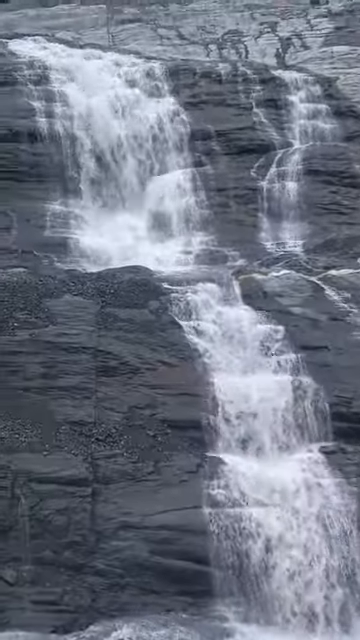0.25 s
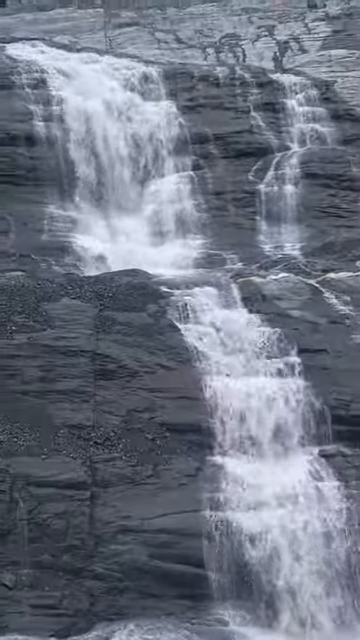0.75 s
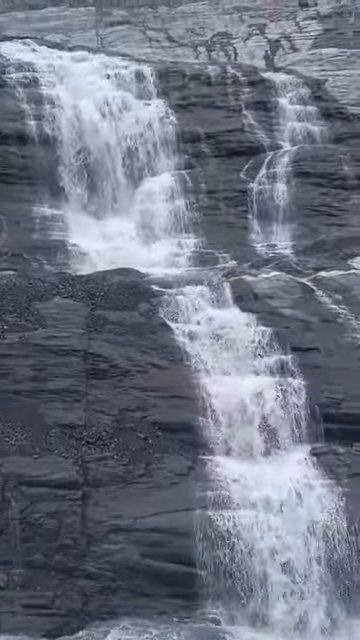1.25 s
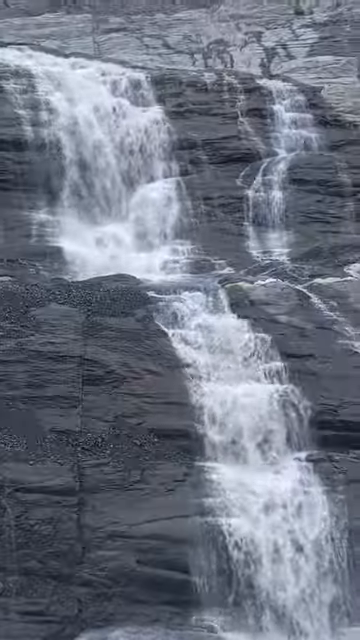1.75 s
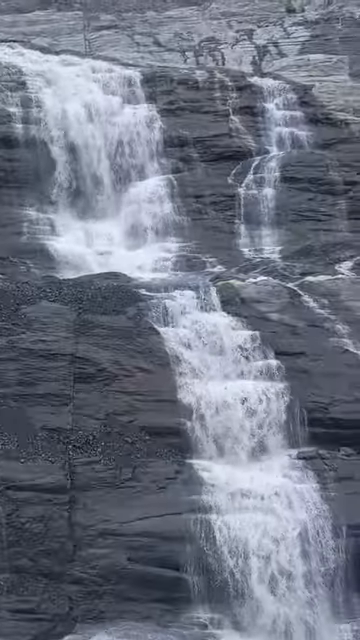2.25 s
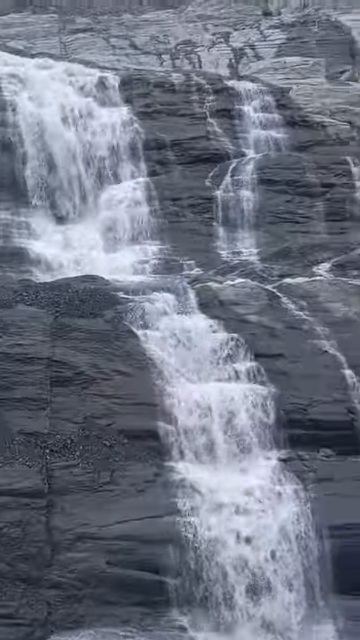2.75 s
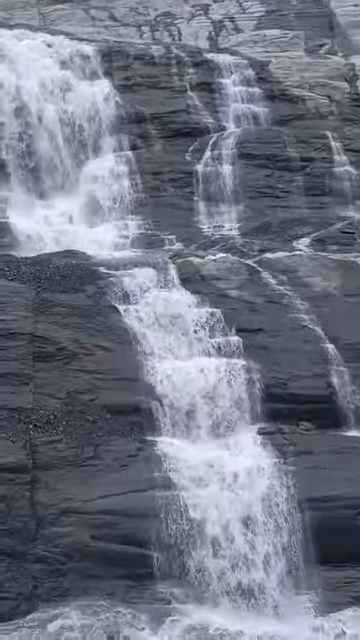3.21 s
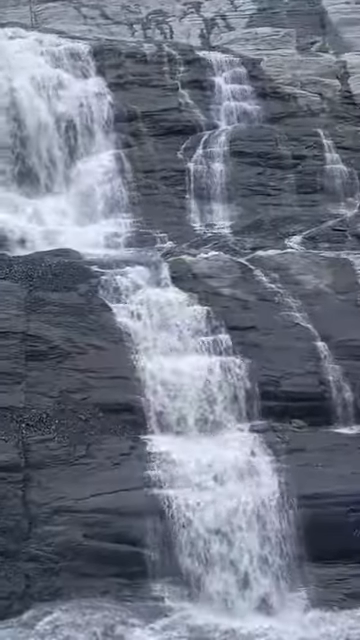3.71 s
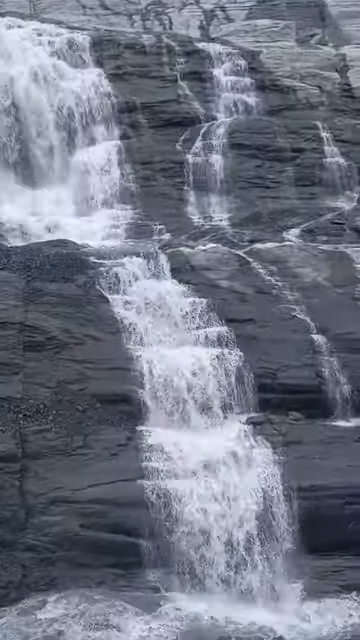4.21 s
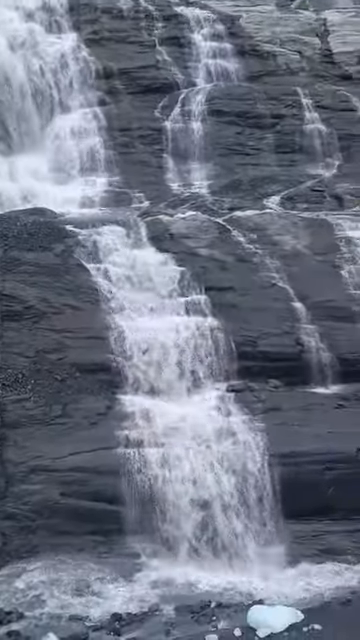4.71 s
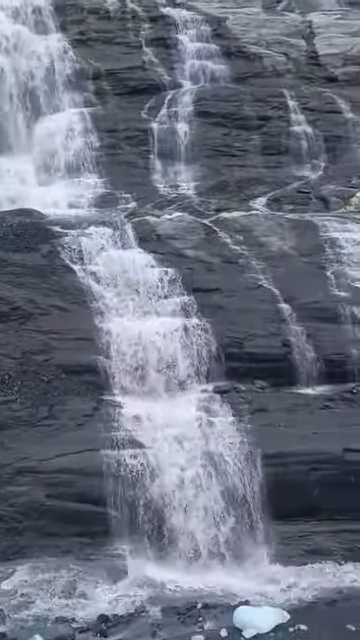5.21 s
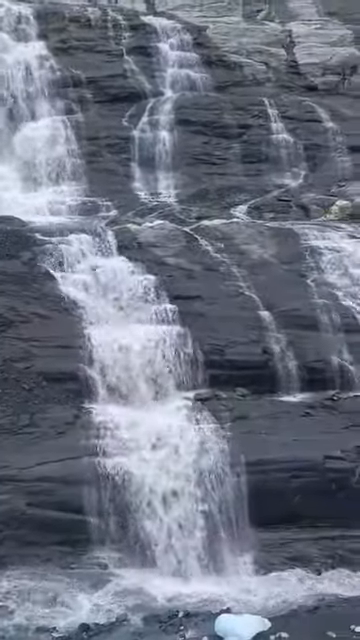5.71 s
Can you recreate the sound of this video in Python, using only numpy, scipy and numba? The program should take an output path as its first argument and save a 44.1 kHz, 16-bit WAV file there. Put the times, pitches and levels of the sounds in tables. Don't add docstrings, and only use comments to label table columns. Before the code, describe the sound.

Rushing waterfall hiss dips and recovers as wind buffets a hand-held phone, with a brief low gulp of water past the middle.

```python
import sys
import numpy as np
from scipy import signal
from scipy.fft import rfft, irfft
from scipy.io import wavfile
from scipy.ndimage import uniform_filter1d
from numba import njit

SR = 44100
rng = np.random.default_rng(int(sys.argv[2]) if len(sys.argv) > 2 else 0)


def ratio(d):
    e = np.asarray(d, float) / 20
    return 10 ** e


def wav_out(sig):
    wavfile.write(sys.argv[1], SR, np.round(np.clip(np.atleast_2d(sig).T, -1, 1) * 32767).astype(np.int16))


N = 262836
TIME, HZ = np.arange(N) / SR, np.arange(N // 2 + 1) * SR / N + 1e-3
OPEN_DB = -24
HOLLOW_HZ = 1330


def curve(table):
    return np.interp(TIME, *np.transpose(table))


def colour(table):
    hz, db = np.transpose(table)
    return ratio(np.interp(np.log(HZ), np.log(hz), db, left=-120, right=-120))


def unit(x):
    return x / np.sqrt(np.mean(x ** 2))


def slew(x, seconds):
    return uniform_filter1d(x, max(int(seconds * SR), 1))


def walk(rate):
    hold = int(SR / rate)
    steps = np.repeat(rng.standard_normal(N // hold + 1), hold)
    return unit(uniform_filter1d(uniform_filter1d(steps, hold), hold)[:N])


def bells(events):
    return sum(db * np.exp(-((TIME - s) / half) ** 2) for s, db, half in events)


def bands(spectrum, lo_hz, per_octave, count):
    place = np.clip(per_octave * np.log2(HZ / lo_hz), 0, count - 1)
    for k in range(count):
        share = np.clip(1 - abs(place - k), 0, 1)
        yield lo_hz * 2 ** (k / per_octave), irfft(spectrum * share, N)


def mottle(x, depth_db, size, cell, cap=np.inf):
    cells = signal.stft(x, nperseg=size)[2]
    blots = rng.standard_normal(cells.shape[1:])
    blots = uniform_filter1d(blots, cell[0], axis=0)
    blots = unit(uniform_filter1d(blots, cell[1], axis=1))
    return signal.istft(cells * ratio(depth_db * np.minimum(blots, cap)), nperseg=size)[1][:, :N]


def ports(source):
    # (frequency [Hz], share [0-1])
    likeness = [(60, .1), (250, 0.4), (700, 0.64), (1300, 0.2), (1900, 0.56), (2800, 0), (5000, 0.22),
                (9000, 0.08), (13000, 0)]
    # (frequency [Hz], phase [radians])
    lead = [(0, 0), (1300, -.3), (1800, .35), (2400, -.55), (3500, -3), (6000, -3.3), (7300, -6.3),
            (15500, -6.3)]
    hz, share = np.transpose(likeness)
    share = np.clip(np.interp(np.log(HZ), np.log(hz), share), 0, 1)
    turn = np.exp(.5j * np.interp(HZ, *np.transpose(lead)))
    common, left, right = (rfft(source()) for _ in range(3))
    together = np.sqrt(share) * common * np.array([turn, 1 / turn])
    return together + np.sqrt(1 - share) * np.array([left, right])


def guard():
    # (time [s], level [dB])
    slow_grip = [(0.0, -24.5), (0.3, -24), (0.7, -24), (1.2, -24.5), (1.55, -25), (1.9, -27), (2.0, -34),
                 (2.5, -33.43), (2.85, -29.5), (2.95, -29), (3.5, -27), (3.75, -25), (4.3, -23.5),
                 (5.0, -24.5), (5.96, -23.5)]
    # (middle [s], depth [dB], half length [s])
    ducks = [(0.401, 3.5, 0.077), (0.527, 7.7, 0.026), (0.605, 8.1, 0.07), (0.797, 6, 0.062),
             (1.011, 5.5, 0.0094), (1.084, 6.1, 0.033), (1.624, 4.5, 0.015), (1.747, 6, 0.044),
             (1.844, 7, 0.022), (1.928, 8.5, 0.02), (2.257, 5, 0.02), (2.412, 8.5, 0.023),
             (2.472, 4, 0.032), (2.566, 5, 0.028), (2.69, 4.5, 0.015), (2.813, 7.5, 0.088),
             (3.066, 2.5, 0.073), (3.223, 4.5, 0.037), (3.387, 6.5, 0.017), (3.511, 6.5, 0.021),
             (3.581, 2, 0.046), (4.003, 4, 0.039), (4.123, 7.5, 0.045), (4.258, 2, 0.044),
             (4.448, 4, 0.046), (4.723, 6.5, 0.024), (4.84, 5.5, 0.02), (4.998, 5, 0.011),
             (5.129, 4.5, 0.0071), (5.916, 6, 0.039)]
    return curve(slow_grip) - bells(ducks)


def mute():
    # (start [s], length [s], depth [dB])
    muted = [(0, 0.1, 8), (0.52, 0.34, 22), (1.034, 0.1, 22), (1.5, 0.14, 6), (1.637, 0.14, 27),
             (1.777, 0.19, 11), (1.95, 1.68, 27.5), (3.69, .12, 14), (4.014, 0.15, 8), (4.725, 0.27, 3),
             (5.46, 0.078, 10), (5.914, .06, 15)]
    spells = sum(db * ((TIME >= s) & (TIME < s + length)) for s, length, db in muted)
    return 1 + slew(1. * spells, .04)


def tint(taken_db):
    # (time [s], turn [0-1])
    swing_away = [
        (0, 0.2),
        (1.4, 0),
        (3.3, 0),
        (3.8, 0.12),
        (4.7, 0.7),
        (5.0, 1),
        (5.7, 1.05),
        (5.96, 0.4),
    ]
    turned = curve(swing_away)
    grip_db = slew(taken_db - taken_db.mean(), 0.27)
    hollow_db = 3 - 10 * turned
    low_db = -0.42 * 0 + 0.42 - 1.5 * turned + 0.34 * grip_db
    lean_db = -2.15 + 0.3 * turned - 0.19 * grip_db
    return hollow_db, low_db, lean_db


@njit
def bubbles(start, hz, size, cycles, glide, length):
    out = np.zeros(length)
    for k in range(len(start)):
        step = 2 * np.pi * hz[k] / SR
        n, phase = int(cycles * SR / hz[k]), 0.
        for i in range(min(3 * n, length - start[k])):
            phase += step * (1 + glide * i / n)
            out[start[k] + i] += size[k] * np.exp(-2. * i / n) * np.sin(phase)
    return out


def churn(count=14000, mean_hz=1617, spread=0.3, size_db=4.0, cap_db=9, cycles=8.6, glide=0.081):
    chance = rng.random((count, 3)).T
    start = (chance[0] * N).astype(np.int64)
    hz = mean_hz * np.exp(spread * 2 * (2 * chance[1] - 1))
    size = ratio(np.minimum(-size_db * np.log(chance[2]), cap_db))
    return unit(bubbles(start, hz, size, cycles, glide, N))


def roar(bubble_db=-7, notch_hz=1793, notch_width_hz=31, notch_depth=0.66, trim_hz=264):
    # (frequency [Hz], level [dB per Hz])
    roar_colour = [(190, -18), (330, -11.5), (458, -11.5), (573, -6.5), (764, -6.5), (1100, -4.5),
                   (1680, 0.5), (1820, 1.5), (1990, -0.5), (2990, -6), (4930, -6), (6410, -3.5), (6840, -9),
                   (7600, -39), (9880, -67), (16700, -120)]
    shape = colour(roar_colour)
    hiss = ports(lambda: rng.standard_normal(N)) * shape
    pops = ports(churn) * np.clip(shape * ratio(0.5), 0, 1)
    both = hiss / np.std(irfft(hiss, N)) + ratio(bubble_db) * pops
    middle = irfft(both * (1 - notch_depth / (1 + ((HZ - notch_hz) / notch_width_hz) ** 2)) * 0
                   + both * (HZ > 2600) * (HZ < 6600), N)
    notch = 1 - notch_depth / (1 + ((HZ - notch_hz) / notch_width_hz) ** 2)
    both = both * notch / np.std(middle.mean(axis=0))
    return both / np.sqrt(1 + (trim_hz / HZ) ** 16)


def flicker(spectrum, hiss_db, surge_db, clump_db=0.07, patch_db=0.48, guard_share=0.29):
    # (middle [s], rise of the churn [dB], half length [s])
    sheets = [(.25, 1, 0.17), (.86, 2, .05), (1.1, 1, 0.025), (1.24, 2.5, 0.028), (2.3, 0.5, .08),
              (2.73, 1.5, 0.021), (3.2, 0.5, .08), (3.87, 1.5, 0.052), (4.6, 0.7, 0.12), (4.75, -1, 0.025),
              (5.4, 1.7, 0.095), (5.55, 2.5, .03), (5.85, 0.5, .07)]
    churn_db = 0.23 * (OPEN_DB - hiss_db) + bells(sheets) + .45 * walk(22)
    churn_db = churn_db - churn_db.mean()
    hollow_db, low_db, lean_db = tint(OPEN_DB - hiss_db)
    low_db = low_db + guard_share * mute() * np.array([[-.75], [.25]])
    out = 0
    for hz, sound in bands(spectrum, 320, per_octave=7, count=28):
        low = np.clip(np.log2(1100 / hz) * 2, 0, 1)
        high = np.clip(np.log2(hz / 2300) * 1.1, 0, 1)
        above = np.log2(hz / HOLLOW_HZ)
        tilt_db = low * low_db + (1 - high) * churn_db
        tilt_db = tilt_db + (1 - low - high) * lean_db * np.clip(above * 2.3, -.5, .5)
        tilt_db = tilt_db + hollow_db * np.exp(-(above / 0.11) ** 2)
        tilt_db = tilt_db - 0.51 * hollow_db * np.exp(-(np.log2(hz / 1097) / 0.073) ** 2)
        own_db = clump_db * walk(24.07) + patch_db * walk(6)
        out = out + sound * ratio(tilt_db + surge_db + own_db)
    return out


def spray(mist_db=7, mist_cap=.9):
    # (frequency [Hz], level [dB per Hz])
    spray_colour = [(8150, -43), (8300, -6.5), (8900, -2), (9100, 0), (11000, -1.5), (13000, -5.5),
                    (13900, -9), (14500, -2.5), (15100, -2), (15400, -10), (15600, -40)]
    mist = irfft(ports(lambda: rng.standard_normal(N)) * colour(spray_colour), N)
    return unit(mottle(mist, mist_db, size=1024, cell=(3, 3), cap=mist_cap))


def waterfall(spray_db=-20, shared_db=0.21, splash_db=2.5, pan_db=-0.57):
    hiss_db = guard()
    surge_db = shared_db * walk(30)
    water = flicker(roar(), hiss_db, surge_db)
    water = mottle(water, splash_db, size=1024, cell=(3, 2))
    water = water + spray() * ratio(spray_db + surge_db)
    return water * ratio(hiss_db + pan_db * np.array([[.5], [-.5]]))


def wind(trim_db=2.0, eddy_db=1.5, own_db=2.0, alike=0.14, ring_hz=92, ring_share=.45, steady=.85):
    # (frequency [Hz], level [dB per Hz])
    buffet = [(12, -50), (20, -11), (43, -22), (70, -1.5), (87, 2.5), (146, -2), (188, -6), (317, -5.5),
              (420, -16.5), (550, -32), (920, -120)]
    # (time [s], level [dB])
    breeze = [
        (0, -41.5),
        (.8, -39),
        (1.6, -39.5),
        (2.5, -40.5),
        (3.5, -39),
        (4.4, -36.5),
        (5.1, -40.5),
        (5.96, -45),
    ]
    # (middle [s], rise [dB], half length [s])
    thumps = [(0.185, 5.9, 0.016), (0.332, 6.1, 0.021), (0.451, 8.3, 0.08), (0.762, 7.7, 0.022),
              (1.075, 8.2, 0.035), (1.226, 5.9, 0.026), (1.397, 8.7, 0.05), (1.813, 10.3, 0.069),
              (1.937, 9.1, 0.04), (2.098, 5.6, 0.08), (2.308, 7.6, 0.08), (2.836, 5.9, 0.023),
              (3.004, 7.5, 0.025), (3.154, 3.9, 0.044), (3.268, 4.6, 0.019), (3.572, 4.6, 0.016),
              (3.849, 5.8, 0.042), (3.979, 11.4, 0.029), (4.115, 7.5, 0.036), (4.294, 9.0, 0.024),
              (4.439, 11.5, 0.043), (4.797, 7.0, 0.08), (4.949, 5.7, 0.018), (5.037, 7.7, 0.029),
              (5.145, 8.0, 0.069), (5.295, 7.0, 0.021), (5.418, 7.2, 0.029), (5.646, 13.8, 0.054),
              (5.746, 11.6, 0.025), (5.899, 9.4, 0.066)]
    eddies_db = bells(thumps)
    level_db = curve(breeze) + eddies_db - 1.2 * slew(OPEN_DB - guard(), 0.027)
    pan_db = mute()
    share = ring_share * (1 - ratio(-2 * eddies_db))
    swing = 2 * np.pi * np.cumsum(ring_hz * (1 + .1 * walk(12))) / SR
    out, common = [], rng.standard_normal(N)
    for side in (1, -1):
        port_db = level_db + 10 * np.log10(4 / (1 + ratio(-2 * side * pan_db)))
        push = np.sqrt(alike) * common + np.sqrt(1 - alike) * rng.standard_normal(N)
        air = rfft(push) * colour(buffet)
        eddy = walk(30)
        thump = 0
        for _, sound in bands(air, 64.0, per_octave=3.02, count=8):
            thump = thump + sound * ratio(eddy_db * eddy + own_db * walk(22))
        thump = thump / slew(thump ** 2, .04) ** (steady / 2)
        ring = np.sqrt(2 * share) * np.sin(swing + side * np.pi / 4)
        chop_db = 2.5 * walk(40)
        out.append((np.sqrt(1 - share) * unit(thump) + ring) * ratio(port_db + trim_db + chop_db))
    return np.array(out)


def gulps(cycles=9., glide=.08):
    # (time [s], pitch [Hz], level [dB])
    pockets = [
        (4.095, 480, -23.5),
        (4.115, 570, -22.5),
    ]
    s, hz, db = np.transpose(pockets)
    return bubbles((s * SR).astype(np.int64), hz, ratio(db), cycles, glide, N)


def scene():
    return waterfall() + wind() + gulps()


def low_pass(x):
    return signal.sosfilt(signal.butter(12, 15550, fs=SR, output="sos"), x)


def record(dry):
    return low_pass(dry)


dry = scene()
out = record(dry)
wav_out(out)
```